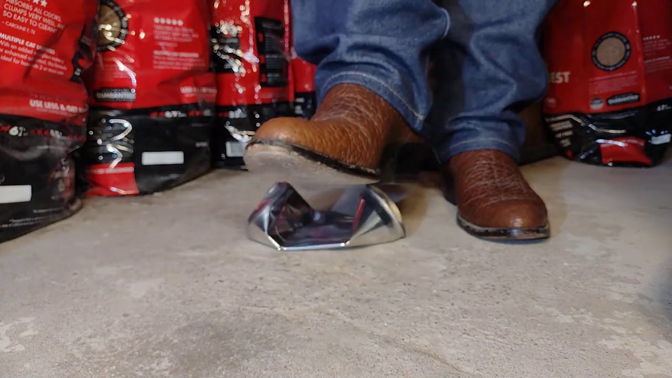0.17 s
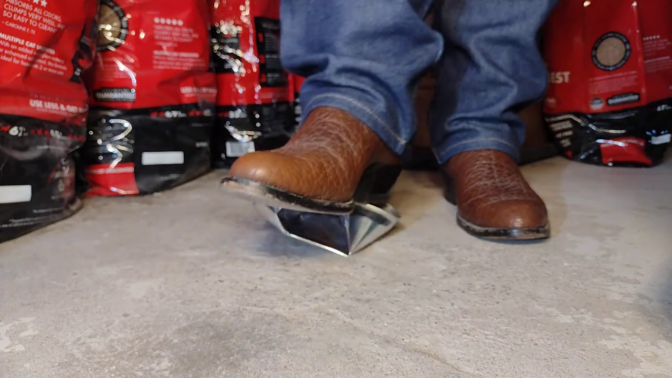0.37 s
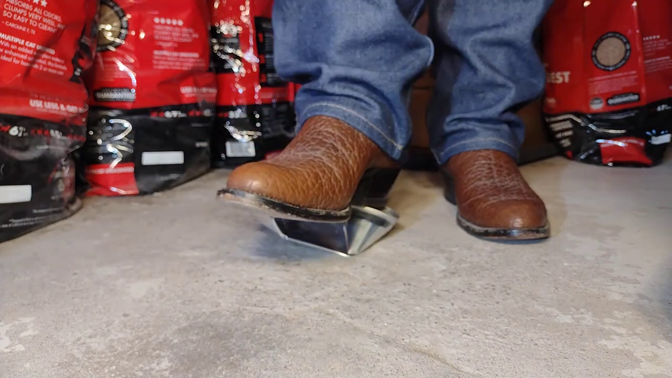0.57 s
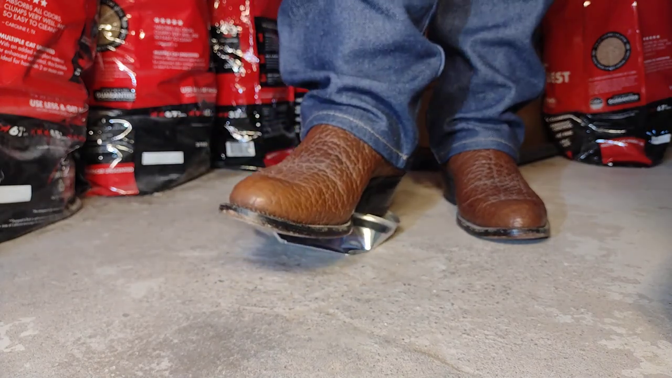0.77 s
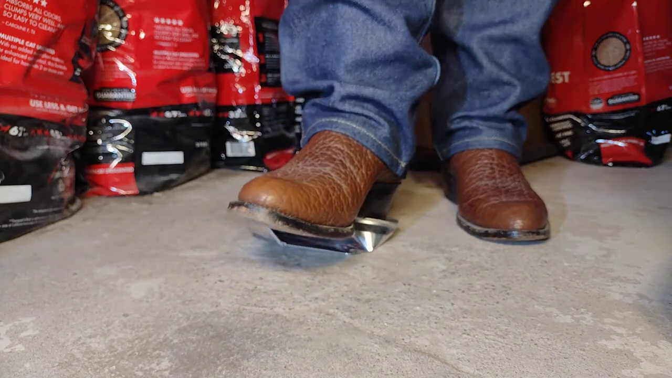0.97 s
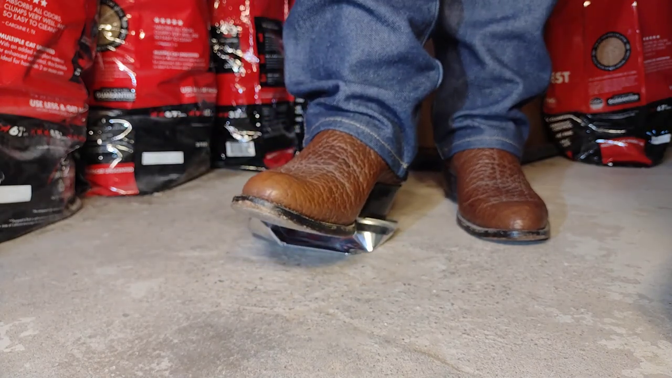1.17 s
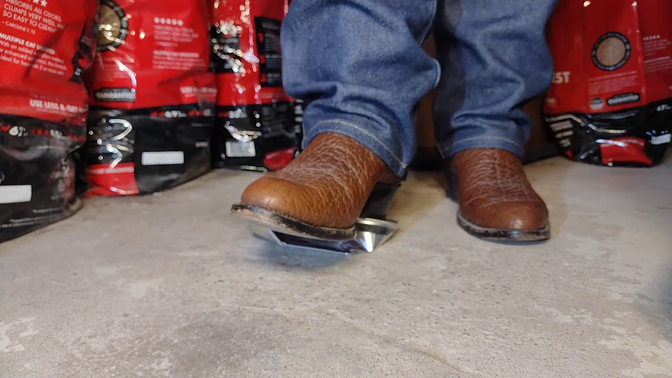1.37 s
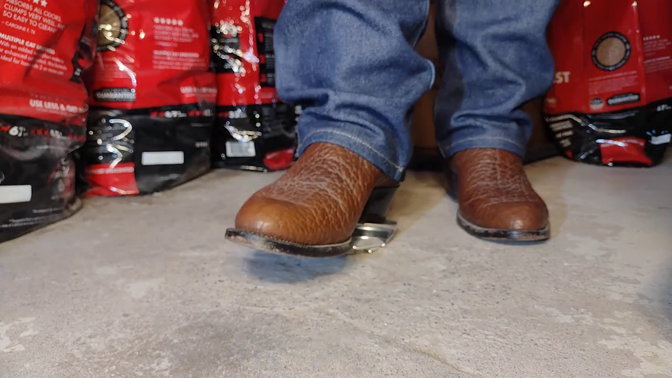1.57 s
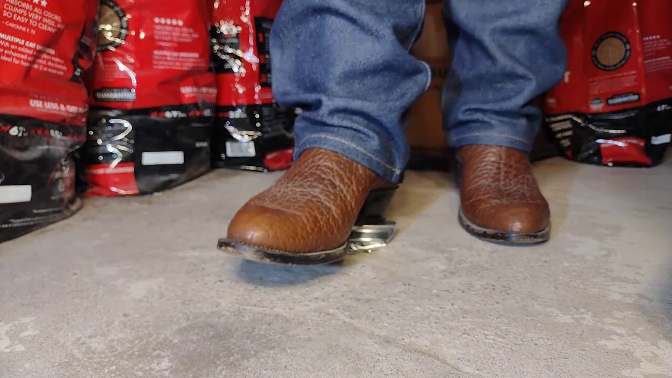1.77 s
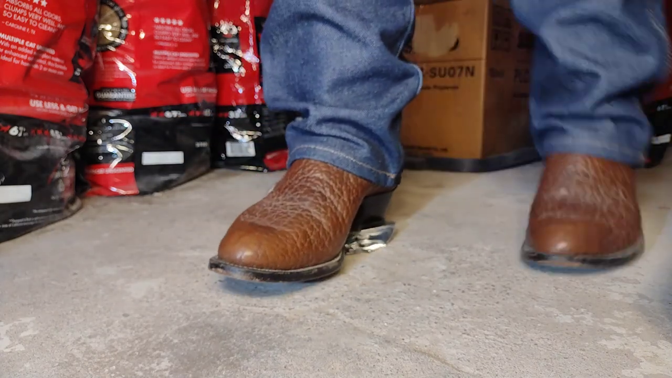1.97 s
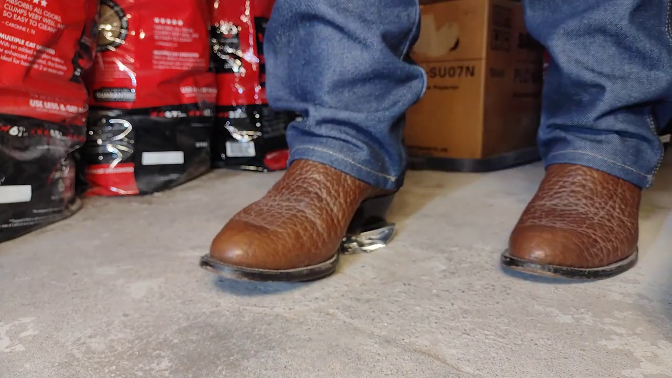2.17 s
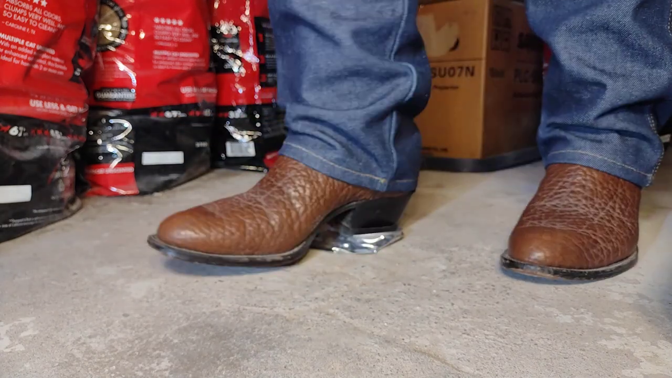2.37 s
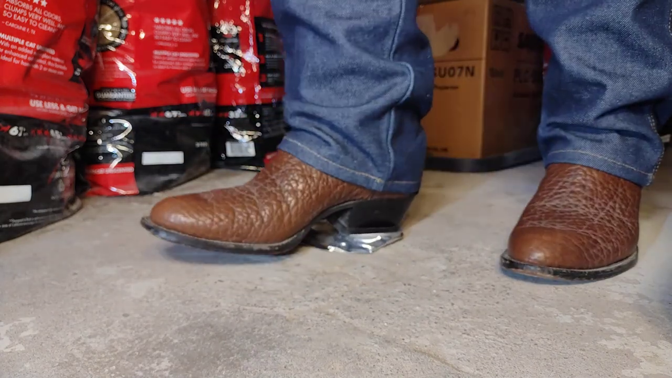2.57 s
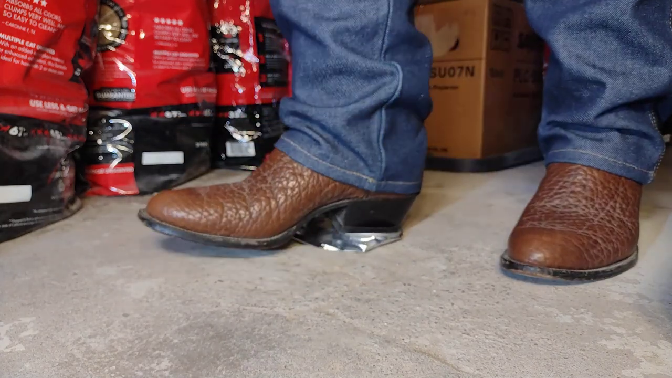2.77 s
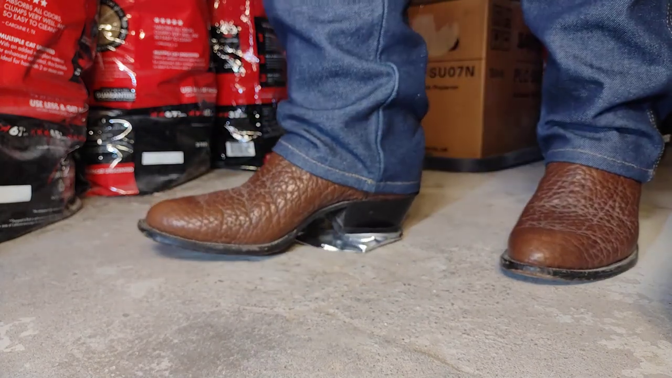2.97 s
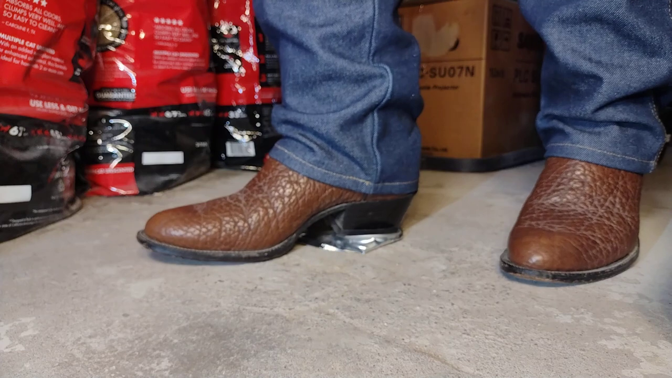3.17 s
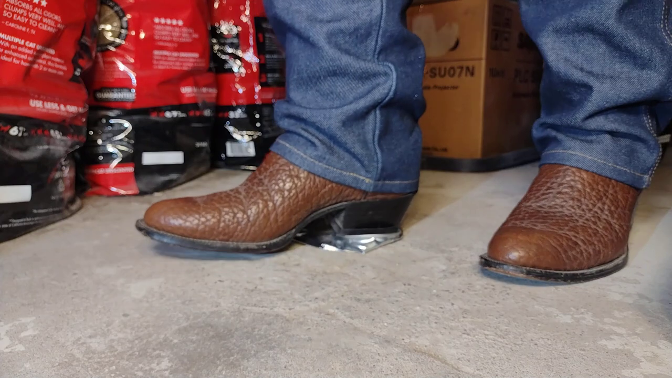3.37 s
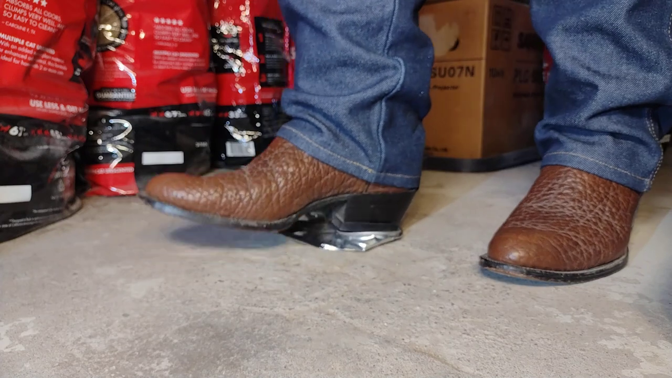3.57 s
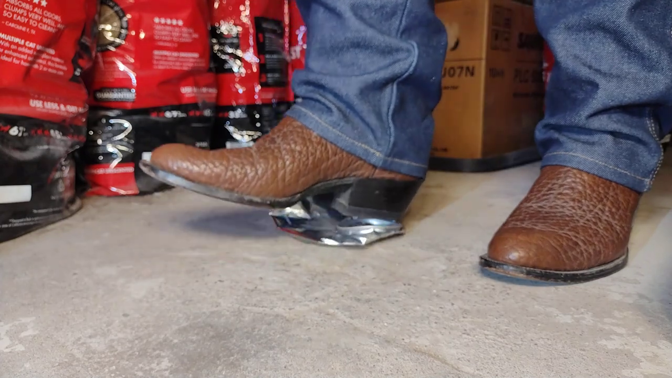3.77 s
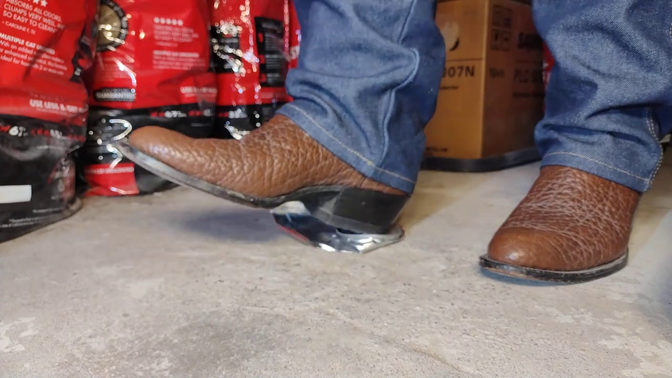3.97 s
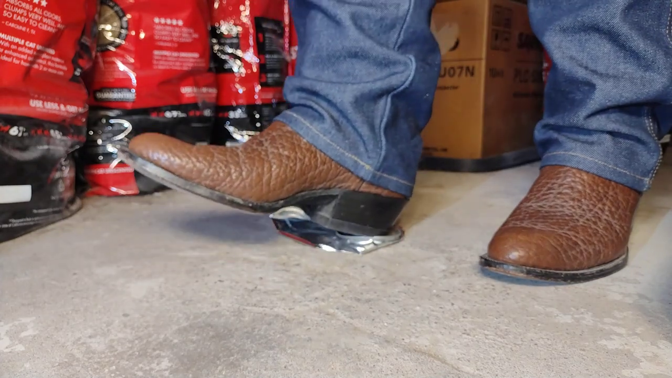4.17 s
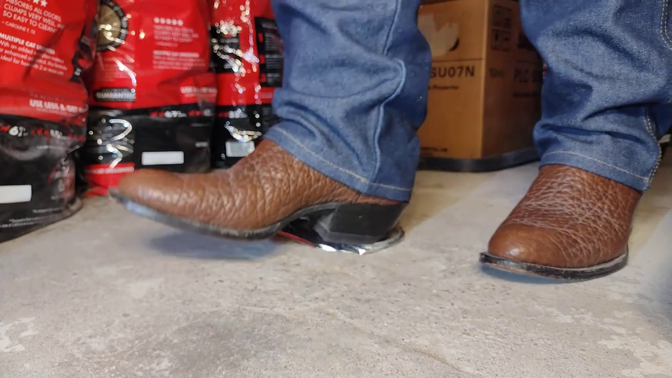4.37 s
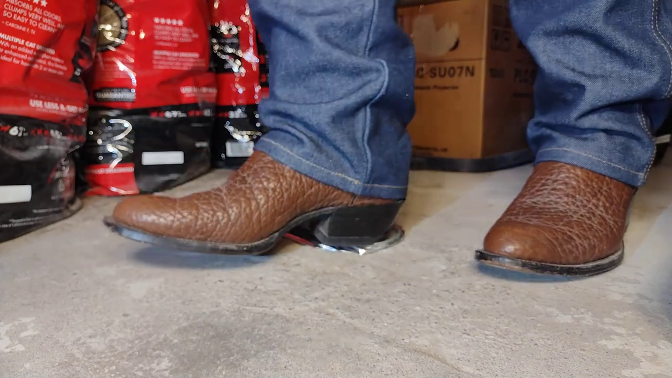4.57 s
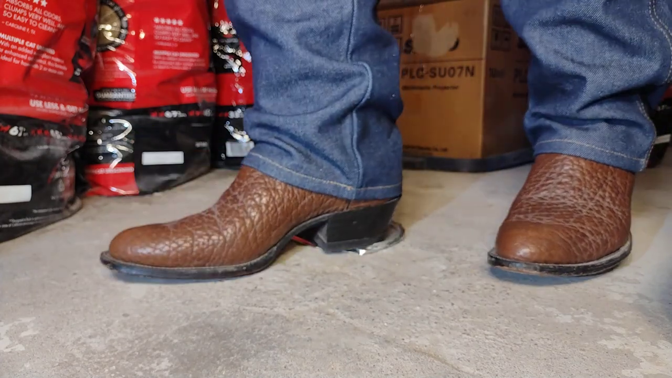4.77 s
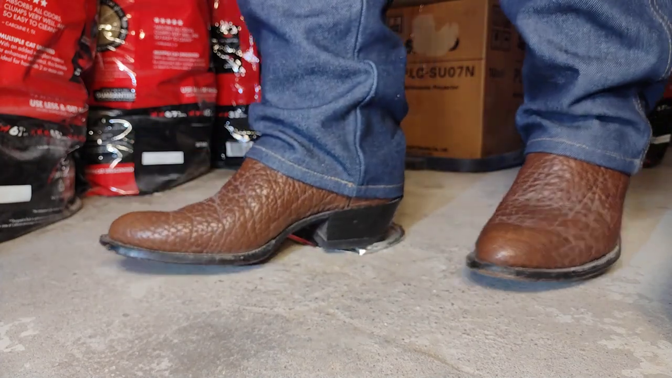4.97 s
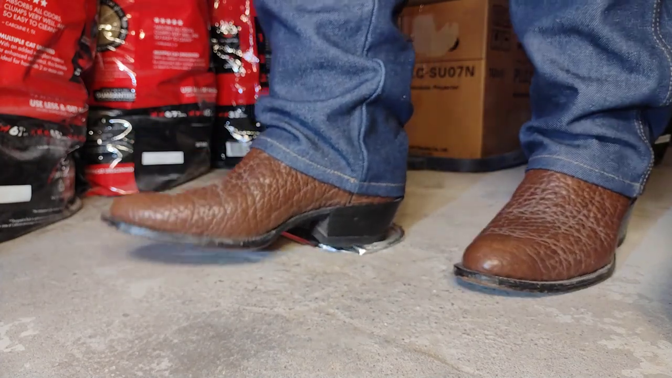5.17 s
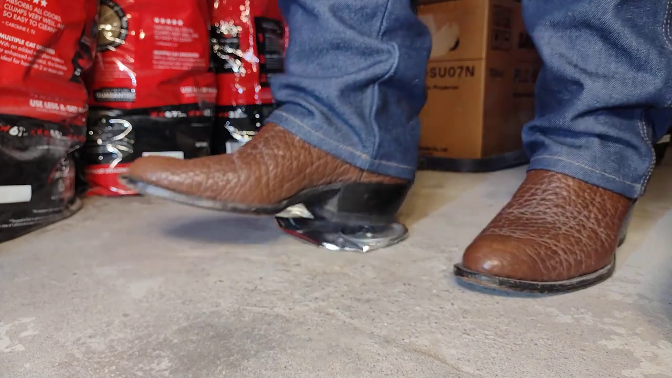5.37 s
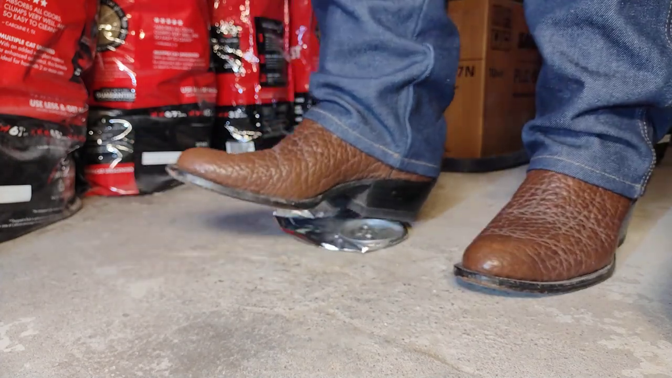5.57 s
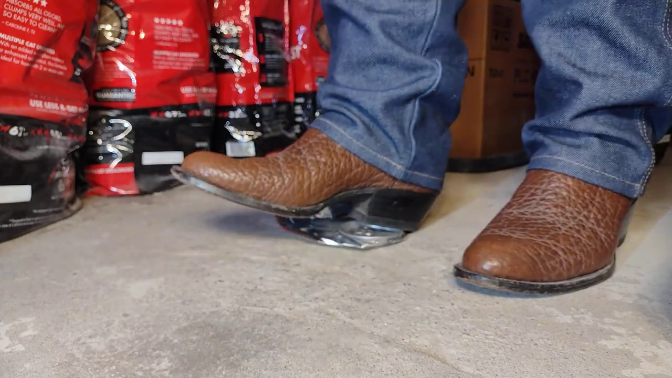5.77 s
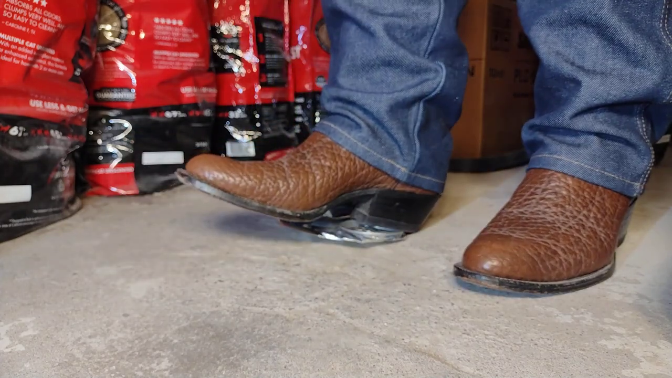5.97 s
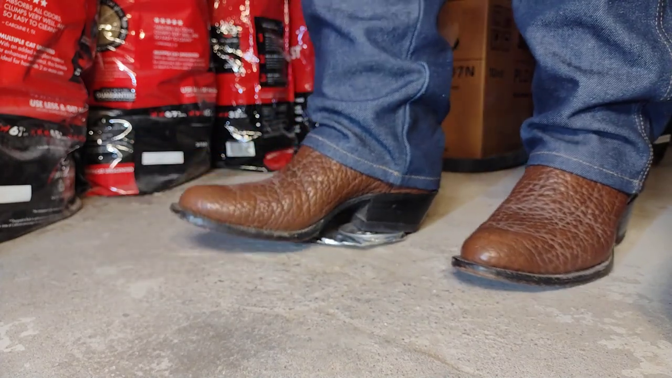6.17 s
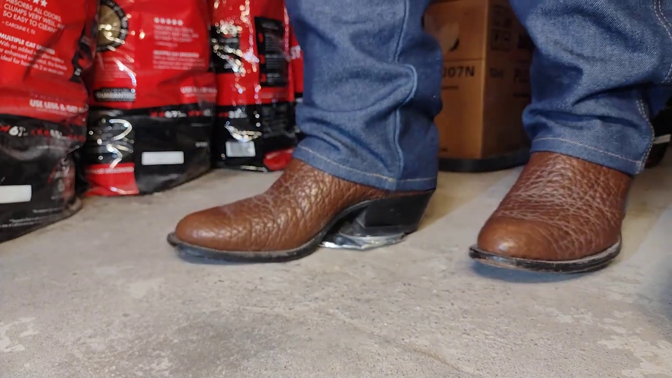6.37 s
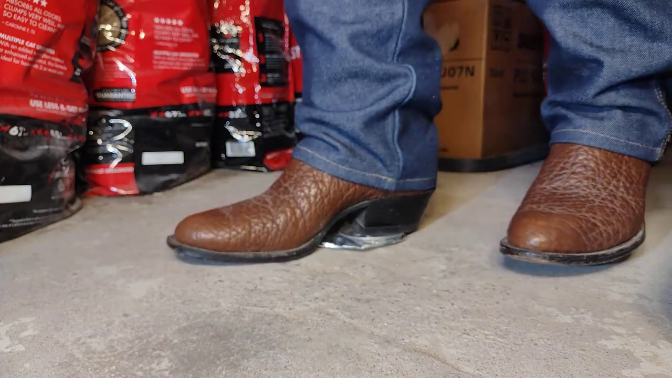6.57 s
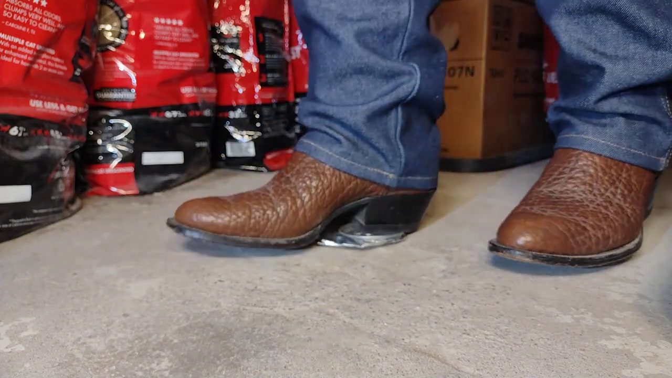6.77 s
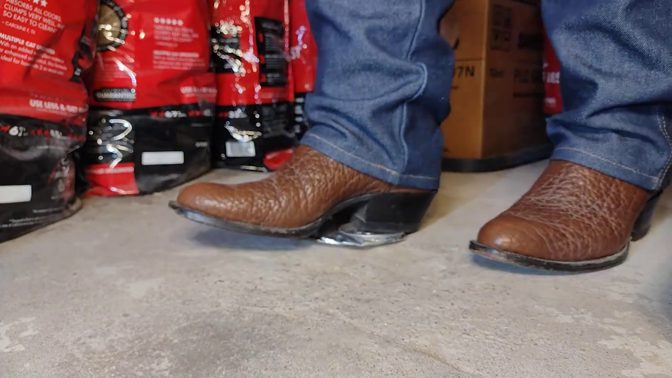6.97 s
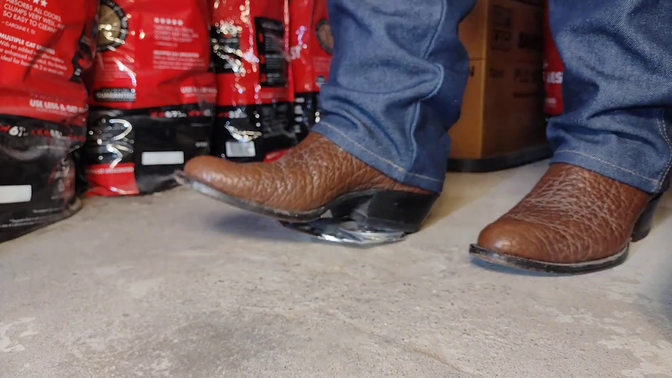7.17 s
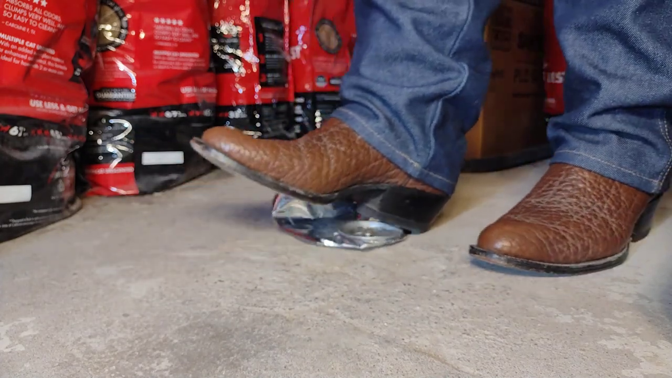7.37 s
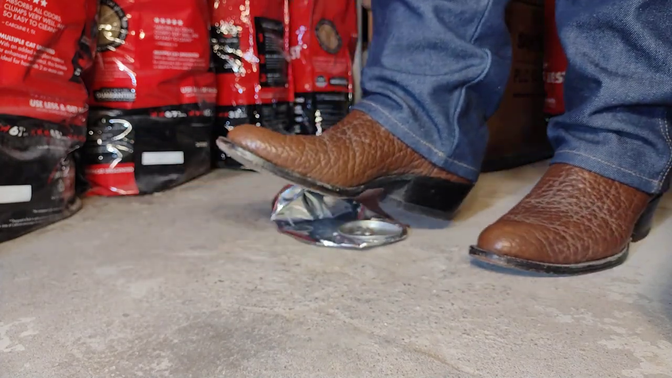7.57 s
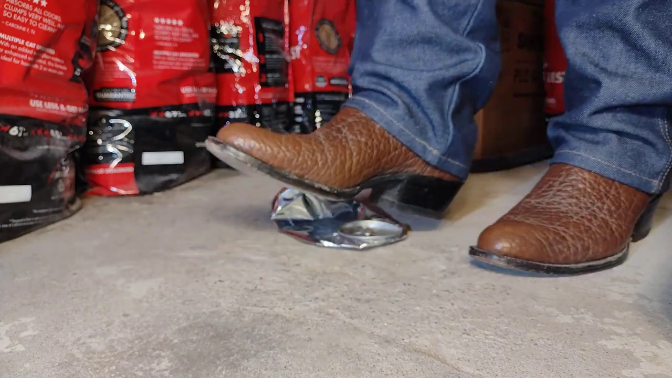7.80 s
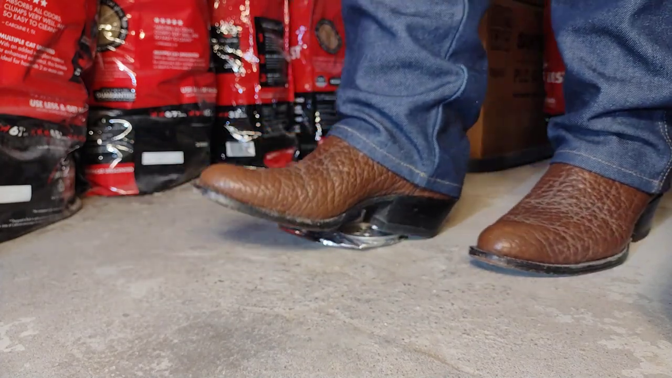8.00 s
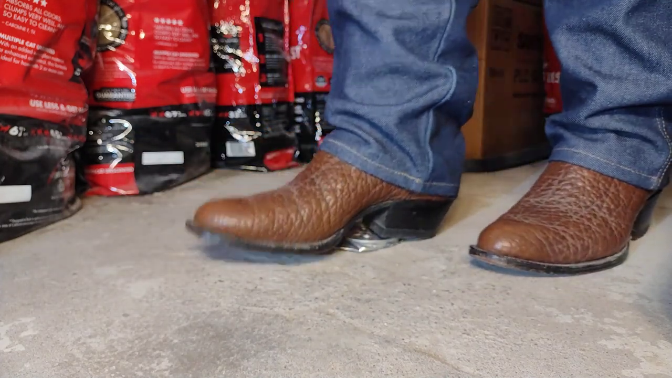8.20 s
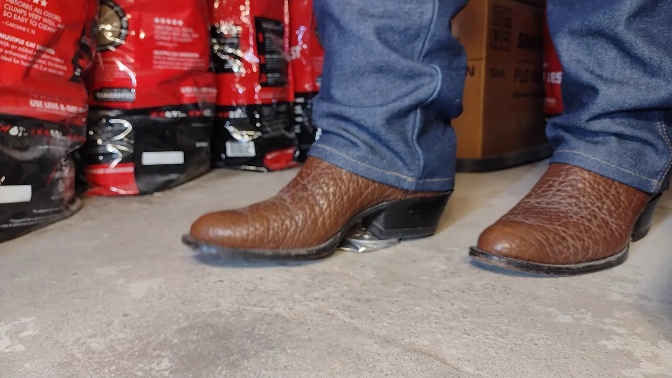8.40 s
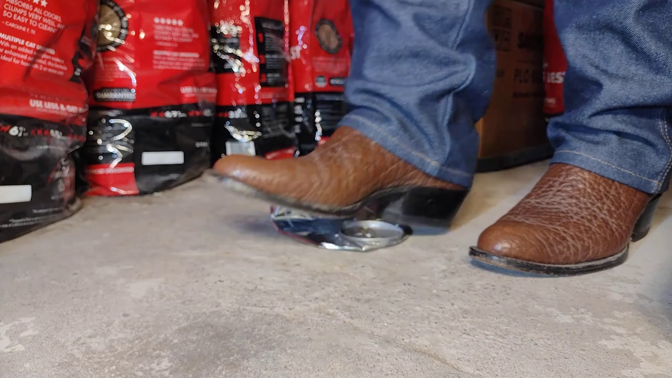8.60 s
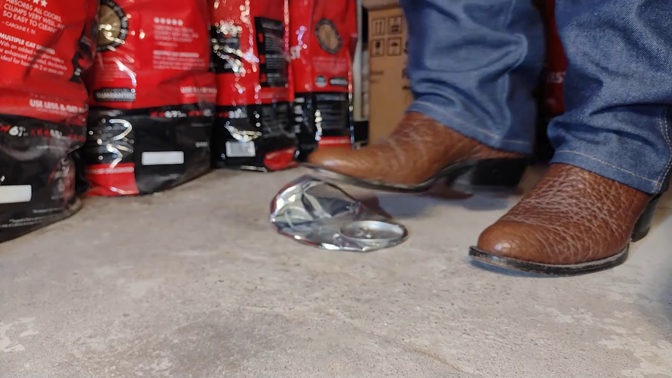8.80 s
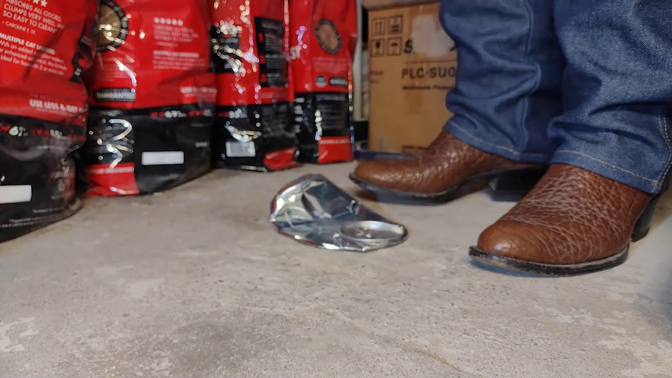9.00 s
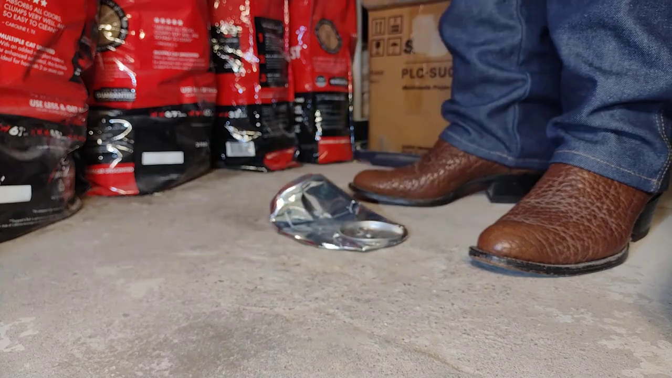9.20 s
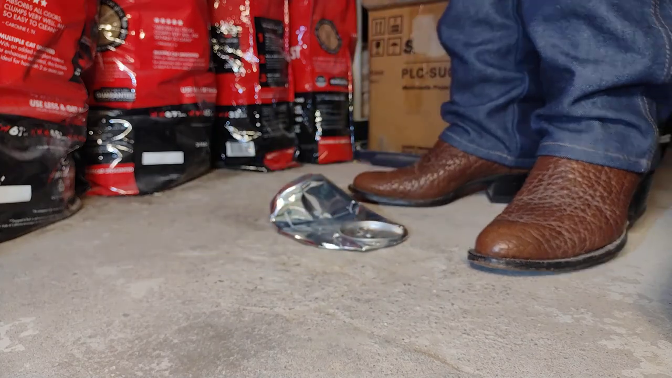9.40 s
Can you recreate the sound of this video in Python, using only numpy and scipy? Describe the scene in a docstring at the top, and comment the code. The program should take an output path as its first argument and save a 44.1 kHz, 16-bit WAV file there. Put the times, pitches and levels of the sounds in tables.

```python
"""A thin metal can is ground flat under a boot heel on concrete, over a faint room tone, for about 9.4 s.
Grit first ticks as decaying clicks; from a quarter second on, folds snap through as bursts of noise exciting
the sheet's modes, while pushes crinkle, scrape and groan as modulated noise and heel thuds are low noise puffs.
A floor drone of resonant noise swells between about 2 and 4 s; wavering sine rings come mostly after 5.7 s.
The last snaps fade by 9 s, then a few grit ticks follow; a small damped store room answers throughout."""
import sys
import numpy as np
from scipy import signal
from scipy.fft import rfft, irfft, next_fast_len
from scipy.io import wavfile
from scipy.ndimage import uniform_filter1d

SR = 44100
rng = np.random.default_rng(int(sys.argv[2]) if len(sys.argv) > 2 else 0)


def decibels_to_gain(level_db):
    """Convert a level in decibels to a linear amplitude gain (20 dB per decade)."""
    exponent = np.asarray(level_db, float) / 20
    return 10 ** exponent


def store_wav(level_fs):
    """Save 16-bit WAV to argv[1]."""
    pcm = np.round(np.clip(np.atleast_2d(level_fs), -1, 1) * 32767)
    wavfile.write(sys.argv[1], SR, pcm.T.astype(np.int16))


N = 416304  # samples

# resonances of the dented can: (centre [Hz], width [Hz], level [dB])
CAN_MODES = [(330, 45, -1), (519, 52, 2), (718, 45, -2), (1210, 85, -4), (1430, 50, -6), (1910, 40, -5),
             (2990, 87, -5)]
# broad colour of the sheet: (frequency [Hz], spectral density [dB])
SHEET_COLOUR = [(60, -13.5), (190, -15.5), (260, -7), (800, -10.5), (1200, -7), (7500, -2.5),
                (16000, -15.5)]
CRACK_HZ = 3800  # lower edge of bright cracks and of the grit scrape
FALL_DB_PER_S = 750  # release of a push, smothering of a ring


def unit(x):
    """Normalises the mean square: each row is brought to rms 1."""
    return x / np.sqrt(np.mean(x ** 2, axis=-1, keepdims=True) + 1e-20)


def along(points, hz):
    """Interpolates (frequency [Hz], value) points on a logarithmic frequency axis."""
    f, v = np.transpose(points)
    return np.interp(np.log(hz + 1), np.log(f + 1), v)


def filtered(x, response):
    """Linear filtering: the spectrum is multiplied by a complex response of frequency."""
    size = next_fast_len(x.shape[-1] + 4096)
    hz = np.fft.rfftfreq(size, 1 / SR)
    return irfft(rfft(x, size) * response(hz), size)[..., :x.shape[-1]]


def resonance(hz, centre_hz, width_hz):
    """Damped harmonic oscillator: the response of one mode, gain 1 at its centre."""
    damping = 1j * hz * width_hz
    return damping / (centre_hz ** 2 - hz ** 2 + damping)


def above(hz, edge_hz):
    """Band splitting: the smooth share of power above an edge."""
    return 1 / (1 + (edge_hz / (hz + 1)) ** 6)


def stereo(pair):
    """Interchannel coherence: two unrelated signals become left and right, bass alike, treble unrelated."""
    # (frequency [Hz], left-right correlation)
    likeness = [(100, .98), (350, .92), (700, .4), (1400, .8), (3000, .3), (7000, 0)]

    def turn(hz):
        return np.arccos(np.clip(along(likeness, hz), -1, 1)) / 2

    mid = filtered(pair[..., 0, :], lambda hz: np.cos(turn(hz)))
    side = filtered(pair[..., 1, :], lambda hz: np.sin(turn(hz)))
    return np.stack([mid + side, mid - side], axis=-2)


def can(hz, bend=0, strength_db=0, ring_db=8):
    """Modal superposition: resonances on the sheet's colour; bend and strength hold one value per mode."""
    centre, width, db = np.transpose(CAN_MODES)[..., None, None, None]
    modes = decibels_to_gain(db + ring_db + strength_db) * resonance(hz, centre * (1 + bend), width)
    return (1 + modes.sum(axis=0)) * decibels_to_gain(along(SHEET_COLOUR, hz))


def crackle(rate, spread_db, t60):
    """Random impulse process: ticks per second, a few large among many small, each dying in t60 [s]."""
    when, size = rng.random((2, N))
    impulses = (when < rate / SR) * decibels_to_gain(-spread_db * np.log(size + 1e-9))
    return unit(signal.lfilter([1], [1, -decibels_to_gain(-60 / (t60 * SR))], impulses))


def snap_envelope(age, t, crack_db, noise):
    """Transient excitation: a blow with a ragged tail and a click that grows with the crack."""
    rise, spike = 0.038, 0.2  # rise time and length of the blow, as shares of t60
    tail_db, jerk_db = -8, 3.5
    click_db, click_grows, click_t60 = -6, 0.29, 0.0044  # [dB], [dB per dB of crack], [s]
    shape = (1 - np.exp(-age / rise)) * (decibels_to_gain(-60 * age / spike) + decibels_to_gain(tail_db - 60 * age))
    # the fold runs on in small jerks
    shape = shape * decibels_to_gain(jerk_db * unit(uniform_filter1d(noise, size=120)))
    # a hard crack starts with a click
    return shape + decibels_to_gain(click_db + click_grows * crack_db - 60 * t / click_t60)


def snaps():
    """Snap-through buckling: a ragged burst shakes the sheet's modes and frees one panel to ring."""
    # (time [s], level [dB], bright crack over panel [dB], freed panel's pitch [Hz], t60 [s])
    folds = [ (0.252, -16, -25, 589, 0.28), (0.267, -6.5, -8.5, 1921, 0.16),
             (0.3, -15.5, -12.5, 1613, 0.19), (0.314, -5.5, -3.5, 3563, 0.16),
             (0.344, -9.5, -0.5, 1953, 0.1), (0.387, -9, -25, 2014, 0.1), (0.424, -7, -3.5, 1675, 0.1),
             (0.449, -6.5, 3.5, 1859, 0.16), (0.606, -23, -9.5, 3390, 0.16), (0.622, -4, -13, 3157, 0.13),
             (0.65, -17, -3.5, 347, 0.026), (0.661, -3, 0, 2820, 0.08), (0.697, -3.5, 4, 570, 0.12),
             (0.733, -14, -12, 2008, 0.3), (0.81, -11, -12.5, 2008, 0.19), (0.863, -2.5, -5, 1842, 0.066),
             (0.897, -6.5, -13, 1937, 0.059), (0.925, -8.5, -0.5, 3314, 0.04),
             (1.006, -8, -11, 2020, 0.031), (1.517, -34.5, -31.5, 1506, 0.26),
             (1.57, -11.5, -19.5, 1413, 0.066), (1.696, -6.5, -3.5, 1454, 0.11),
             (1.773, -13, -19, 1113, 0.16), (1.892, -17, -34.5, 1230, 0.097),
             (1.914, -10.5, -7, 511, 0.049), (1.931, -3.5, 4, 549.7, 0.11), (1.966, -3.5, 7, 1348, 0.062),
             (1.995, -5, 4, 1853, 0.078), (2.096, -17.5, 2, 2066, 0.096), (2.108, 0, -2, 3176, 0.046),
             (2.212, -3.5, 3, 984, 0.07), (2.301, -8, -3.5, 3280, 0.099), (2.354, -8, 2.5, 3250, 0.29),
             (2.451, -17.5, -13.5, 1246, 0.27), (2.475, -13.5, -3.5, 1076, 0.14),
             (2.656, -20.5, -11.5, 1177, 0.26), (2.692, -20.5, 11.5, 1203, 0.22),
             (2.746, -6.5, 3, 1164, 0.15), (2.84, -16, -19.5, 1885, 0.055), (2.938, -32, -29, 548, 0.067),
             (2.979, -3, 1, 1221, 0.1), (3.127, -15.5, -31.5, 1260, 0.059),
             (3.149, -13.5, -3.5, 1530, 0.058), (3.165, -21, -20, 1500, 0.043),
             (3.199, -14, -4, 1617, 0.077), (3.383, -26, 1.5, 339, 0.2), (3.582, -23.5, -24.5, 1203, 0.097),
             (3.605, -25, -23.5, 1110, 0.13), (3.681, -18.5, -30, 1290, 0.065),
             (3.733, -9.5, -10.5, 1110, 0.16), (3.747, -3.5, -1, 1684, 0.14),
             (3.809, -9, -12.5, 1481, 0.27), (4.087, -16, -8, 1360, 0.18), (4.11, -4.5, 2.5, 1382, 0.16),
             (4.157, -10, 0.5, 1667, 0.1), (4.383, -15.5, 12, 4370, 0.087), (4.464, 1, 13.5, 2670, 0.036),
             (4.504, -5, 5.5, 3053, 0.047), (4.557, -8.5, 22.5, 3367, 0.098), (4.716, -12, 18, 1880, 0.09),
             (5.101, -17, -8.5, 467, 0.12), (5.325, -5.5, 11, 1848, 0.12), (5.37, -7, 3, 2750, 0.07),
             (5.399, -10.5, -23.5, 1900, 0.24), (5.404, -4, 9, 3274, 0.13), (5.731, -15, -42.5, 1308, 0.16),
             (5.741, -8.5, -21.5, 1210, 0.19), (5.797, -8.5, -58, 1361, 0.069),
             (5.807, -18.5, -44, 1152, 0.092), (5.961, -35, -37, 469, 0.066),
             (6.062, -19.5, -18, 1532, 0.11), (6.075, -5, 1.5, 511.4, 0.11),
             (6.121, -5.5, 0.5, 3106, 0.098), (6.186, -21.5, -20.5, 1460, 0.096),
             (6.228, -17, -5.5, 1202, 0.17), (6.25, -17, -11.5, 839, 0.15),
             (6.314, -6.5, -5.5, 2856, 0.073), (6.324, -4, -8, 3030, 0.064),
             (6.411, -21.5, -25.5, 1493, 0.17), (6.478, -5.5, -1, 2990, 0.11),
             (6.648, -16.5, -14.5, 1545, 0.091), (6.715, -14, -28, 1246, 0.09),
             (6.778, -6.5, -11, 1380, 0.063), (6.854, -6.5, -16, 1636, 0.076), (6.889, -9, -11, 3000, 0.09),
             (6.913, -4.5, -2, 1910, 0.071), (6.994, -17, -11, 1426, 0.1),
             (7.087, -26.5, -13.5, 1220, 0.065), (7.184, -18.5, -25, 1213, 0.23),
             (7.25, -14, -8.5, 1200, 0.07), (7.337, -15, -12, 1680, 0.07), (7.405, -14.5, -21, 1926, 0.13),
             (7.503, -14, -33.5, 1370, 0.092), (7.993, -13, -9, 556, 0.34), (8.011, -5.5, -24, 2824, 0.11),
             (8.131, -16.5, -38, 1390, 0.11), (8.34, -22.5, -9.5, 2787, 0.22),
             (8.349, -5.5, -2.5, 1982, 0.11), (8.518, -10.5, -3.5, 1658, 0.07),
             (8.562, -10, -23.5, 1663, 0.14), (8.73, -4, -21.5, 1670, 0.14)]
    bend, spread_db = 0.04, 3.5  # scatter of each mode: relative detuning, strength
    knock_floor_hz, knock_hz = 290, 750  # edges of the hollow knock
    knock_base_db, knock_per_dull, knock_per_octave = -33.5, 0.88, 12  # [dB], [dB per dB], [dB per octave]
    ring_db, ring_per_dull, sharpness = -4, 0.18, 18  # [dB], [dB per dB], Q of the panel
    soften = 0.2  # dB by which the treble corner falls per dB of dullness

    s, db, crack_db, panel_hz, t60 = np.transpose(folds)[..., None, None]
    t = np.arange(SR * 3 // 10) / SR
    modes = len(CAN_MODES)
    tune, strength = rng.standard_normal((2, modes, len(folds), 1, 1))
    noise = rng.standard_normal((len(folds), 3, len(t)))
    age = t / np.clip(t60, .02, 1)
    shape = snap_envelope(age, t, crack_db, noise[:, 2:])
    shake = shape * stereo(noise[:, :2])
    # each fold detunes the can
    body = filtered(shake, lambda hz: can(hz, bend * tune, spread_db * strength))

    panel_gain = 1 / np.sqrt(1 + decibels_to_gain(crack_db) ** 2)
    # a fold without a crack leaves the panel free: it rings louder
    dullness = np.clip(-crack_db, 0, 36)
    octaves_below_1khz = np.clip(np.log2(1000 / panel_hz), 0, None)
    knock_db = knock_base_db + knock_per_dull * dullness + knock_per_octave * octaves_below_1khz

    def panel_band(hz):
        band = np.sqrt(np.abs(above(hz, knock_hz) - above(hz, CRACK_HZ)))
        # a soft fold barely reaches the high modes
        return band / np.sqrt(1 + (hz / CRACK_HZ * decibels_to_gain(soften * dullness)) ** 2)

    knock = filtered(body, lambda hz: np.sqrt(above(hz, knock_floor_hz) * (1 - above(hz, knock_hz))))
    panel = filtered(body, panel_band)
    crack = filtered(body, lambda hz: np.sqrt(above(hz, CRACK_HZ)))
    ring = filtered(decibels_to_gain(-60 * age) * shake, lambda hz: resonance(hz, panel_hz, panel_hz / sharpness))
    parts = [(decibels_to_gain(knock_db), knock),
             (panel_gain, panel),
             (panel_gain * decibels_to_gain(crack_db), crack),
             (panel_gain * decibels_to_gain(ring_db + ring_per_dull * dullness), ring)]

    def power(x):
        return np.mean(x ** 2, axis=(1, 2), keepdims=True)

    # every part is brought to the power of the envelope before its gain
    sounds = decibels_to_gain(db) * sum(gain * part * np.sqrt(power(shape) / power(part)) for gain, part in parts)
    out = np.zeros((2, N + len(t)))
    for at, sound in zip(s.ravel(), sounds):
        out[:, round(at * SR):][:, :len(t)] += sound
    return out[:, :N]


def grind():
    """Stick-slip friction and creasing: ticking creases, hissing grit and a low groan of the flattened wall."""
    # pushes and twists of the heel, levels as reached under full weight:
    # (start [s], length [s], crinkle [dB], grit scrape [dB], low groan [dB])
    pushes = [(0, 0.0026, -28.5, -75.5, -44), (.17, 0.39, -25, -38, -48), (0.635, .4, -35, -34, -52),
              (1.593, 0.11, -39, -52.5, -53.5), (1.944, .55, -33, -38, -44), (2.664, 0.075, -22, -17, -60),
              (3.765, .51, -26.5, -43, -49), (4.323, 0.35, -61.5, -47.5, -68),
              (5.401, .28, -32, -48.5, -51.5), (5.754, 0.12, -37, -50.5, -37),
              (6.116, 0.22, -37, -52, -41.5), (6.729, 0.9, -51, -64, -47), (7.354, 0.23, -32.5, -48.5, -58),
              (8.021, 0.17, -52, -54.5, -44), (8.573, 0.24, -29.5, -44.5, -39)]
    lean_db, rise_db_per_s = 6.5, 295  # growth over a push as the weight comes on; its start
    block = 64  # samples per envelope step
    start, length, *levels = np.transpose(pushes)[..., None]
    t = np.arange(0, N, block) / SR - start
    lean = lean_db * (np.clip(t / length, 0, 1) - 1)
    rise = rise_db_per_s * np.clip(-t, 0, None)
    fall = FALL_DB_PER_S * np.clip(t - length, 0, None)
    push_db = lean - rise - fall
    crinkle, grit, flex = (np.repeat(decibels_to_gain(db + push_db).sum(axis=0), block)[:N] for db in levels)

    creases, scrape, groan = stereo(rng.standard_normal((3, 2, N)))
    creases = crackle(rate=450, spread_db=2.5, t60=0.025) * creases
    creases = unit(filtered(creases, lambda hz: can(hz, ring_db=10)[0] * np.sqrt(1 - above(hz, 2000))))
    scrape = crackle(rate=350, spread_db=3, t60=0.015) * scrape
    scrape = unit(filtered(scrape, lambda hz: decibels_to_gain(along(SHEET_COLOUR, hz)) * np.sqrt(above(hz, CRACK_HZ))))
    groan = crackle(rate=150, spread_db=2.5, t60=0.05) * groan
    groan = unit(filtered(groan, lambda hz: resonance(hz, 280, 90) ** 2 * above(hz, edge_hz=215)))
    return crinkle * creases + grit * scrape + flex * groan


def ticks():
    """Brittle fracture: a grain of grit clicks, brighter the harder it cracks, and the sheet fizzes out."""
    # grit cracking between sheet and concrete: (time [s], peak level [dB])
    grains = [(0.0957, -41), (0.1092, -33.5), (0.178, -34), (0.4347, -1), (0.582, -19), (1.481, -32),
              (1.5548, -22.5), (1.6733, -30.5), (2.4354, -14.5), (2.5999, -32.5), (3.077, -7.5),
              (3.3306, -30.5), (3.9526, -35.5), (4.0751, -21.5), (4.2737, -23.5), (4.306, -11),
              (4.3311, -4), (4.366, -30.5), (4.3712, -9.5), (5.1578, -28.5), (5.5871, -31.5), (5.6444, -36),
              (6.278, -11.5), (7.0798, -30), (7.1717, -24), (7.2328, -16.5), (7.2807, -19.5),
              (7.3697, -20.5), (7.4644, -22), (7.6564, -29.5), (7.7664, -22.5), (8.116, -22),
              (8.2399, -30.5), (8.314, -33.5), (8.6824, -23.5), (9.302, -46.5), (9.3347, -38.5)]
    hardest_hz, dulls = 9000, 0.2  # centre for a 0 dB grain; dB by which it falls per dB of level
    click_t60, tail_db, tail_t60 = 0.008, -8, 0.09  # [s], [dB], [s]
    t = np.arange(SR // 10) / SR
    out = np.zeros((2, N + SR))
    decay = decibels_to_gain(-60 * t / click_t60) + decibels_to_gain(tail_db - 60 * t / tail_t60)
    shake = decay * stereo(rng.standard_normal((len(grains), 2, len(t))))
    centre = hardest_hz * decibels_to_gain(dulls * np.transpose(grains)[1])[:, None, None]
    clicks = filtered(shake, lambda hz: can(hz) * resonance(hz, centre, 2 * centre) ** 2)
    for (s, db), click in zip(grains, clicks):
        out[:, round(s * SR):][:, :len(t)] += decibels_to_gain(db) * click / np.abs(click).max()
    return out[:, :N]


def rings():
    """Free decay: a freed wall sings on at one wavering pitch until the boot smothers it."""
    # low walls of the can left free to ring on: (time [s], level [dB], pitch [Hz])
    walls = [(.7, -26.5, 526), (5.746, -21.5, 532.4), (5.808, -13.5, 1184), (6.08, -20.5, 524),
             (6.718, -25, 957), (7.192, -27, 551), (7.458, -26.5, 259.4), (7.507, -32, 591),
             (8.016, -30.5, 453), (8.134, -26.5, 449), (8.733, -20.5, 534)]
    t60, free_s, rise_s = 0.22, 0.1, 0.0047  # [s]
    phase_step = 0.017  # random walk of the phase [rad per sample, rms]
    t = np.arange(SR // 2) / SR
    out = np.zeros(N + SR)
    drift = phase_step * np.cumsum(rng.standard_normal((len(walls), len(t))), axis=1)
    smothering_db = FALL_DB_PER_S * np.clip(t - free_s, 0, None)
    for (s, db, pitch_hz), phase in zip(walls, drift):
        envelope = decibels_to_gain(db - 60 * t / t60 - smothering_db) * (1 - np.exp(-t / rise_s))
        out[round(s * SR):][:len(t)] += envelope * np.sin(2 * np.pi * pitch_hz * t + phase)
    return out[:N]


def heel():
    """Damped impact: each dull knock of the leather heel is a puff of noise in a broad low resonance."""
    # the heel lands or drops through a fold: (time [s], peak level [dB])
    thuds = [(0.646, -19), (4.193, -29), (5.154, -23), (6.904, -17.5), (8.346, -18), (9.151, -28.5),
             (9.196, -41)]
    t = np.arange(SR // 5) / SR
    out = np.zeros(N + SR)
    puffs = decibels_to_gain(-60 * t / 0.05) * rng.standard_normal((len(thuds), len(t)))  # t60 0.05 s
    knocks = filtered(puffs, lambda hz: resonance(hz, centre_hz=220, width_hz=350) ** 2)
    for (s, db), knock in zip(thuds, knocks):
        out[round(s * SR):][:len(t)] += decibels_to_gain(db) * knock / np.abs(knock).max()
    return out[:N]


def drone():
    """Forced resonance: the dragging heel sets a low resonance humming, as narrow-band noise."""
    # swells under the twists: (time of crest [s], level [dB], half length [s])
    swells = [(2.415, -38.5, 0.092), (2.728, -45.5, 0.091), (3.92, -47.5, 0.12)]
    t = np.arange(N) / SR
    swell = sum(decibels_to_gain(db) * np.exp(-((t - s) / half) ** 2) for s, db, half in swells)
    hum = filtered(rng.standard_normal(N), lambda hz: resonance(hz, centre_hz=97, width_hz=45) ** 2)
    return swell * unit(hum)


def room(x):
    """Diffuse reverberation: the can shifts, so every quarter second meets a new pattern of echoes."""
    t60, delay = 0.17, 0.0049  # [s]
    step = SR // 4
    t = np.arange(SR // 2) / SR
    out = np.zeros((2, N + 2 * SR))
    for at in range(0, N, step):
        tail = stereo(rng.standard_normal((2, len(t)))) * decibels_to_gain(-60 * t / t60)
        answer = signal.fftconvolve(x[:, at:at + step], tail / np.linalg.norm(tail[0]), axes=1)
        out[:, at + round(delay * SR):][:, :answer.shape[1]] += answer
    return out[:, :N]


def room_tone():
    """Stationary background noise: the quiet air of the room as coloured noise, its level wavering a little."""
    # (frequency [Hz], spectral density [dB])
    colour = [(30, -22), (95, 0), (180, -8), (500, -4), (3500, -8), (6500, -19), (16000, -27)]
    level_db, waver_db = -63, 2  # rms before the waver; rms of the waver
    waver = decibels_to_gain(waver_db * unit(uniform_filter1d(rng.standard_normal(N), size=2500)))
    air = filtered(stereo(rng.standard_normal((2, N))), lambda hz: decibels_to_gain(along(colour, hz)))
    return decibels_to_gain(level_db) * waver * unit(air)


def scene():
    """Superposition: can and heel, their echo, the drone and the room tone add up."""
    metal = snaps() + grind() + ticks() + rings()
    boot = heel()
    metal[1] = np.roll(metal[1], 1)  # right lags one sample: the can lies a little to the left
    echo = room(decibels_to_gain(-6.5) * metal + decibels_to_gain(-12.5) * boot)
    return metal + boot + echo + drone() + room_tone()


def low_pass(x):
    """Removes everything above the highest recorded frequency."""
    return signal.sosfilt(signal.butter(12, 16660, fs=SR, output="sos"), x)


def record(dry):
    """Clipping and band limiting: peaks flatten at full scale, then deep bass and top treble are removed."""
    low_hz, top_hz = 90, 15800  # the microphone's bass corner; the band limit
    clipped = np.clip(dry, -1, 1)
    mix = filtered(clipped, lambda hz: (hz < top_hz) * 1j * hz / (low_hz + 1j * hz))
    return low_pass(mix)


dry = scene()
out = record(dry)
store_wav(out)
```